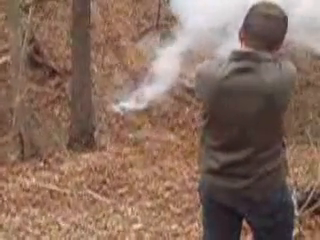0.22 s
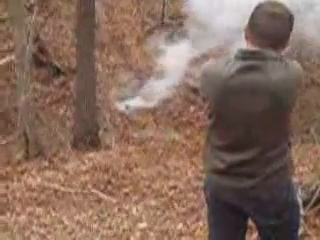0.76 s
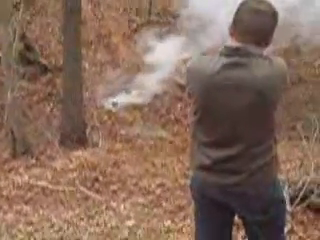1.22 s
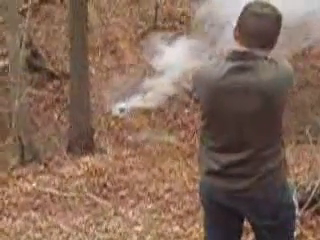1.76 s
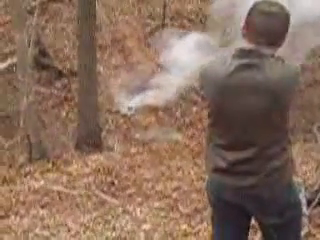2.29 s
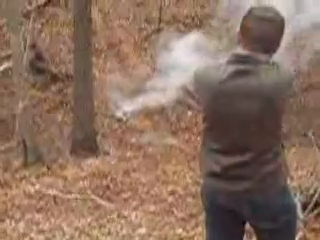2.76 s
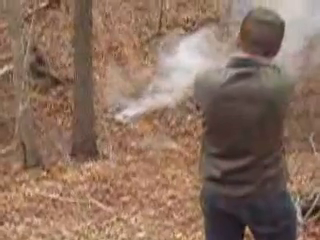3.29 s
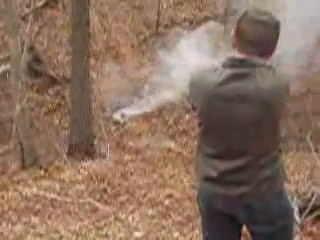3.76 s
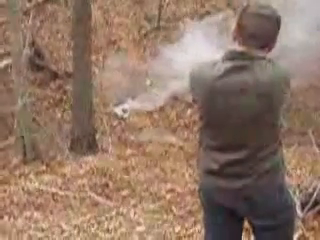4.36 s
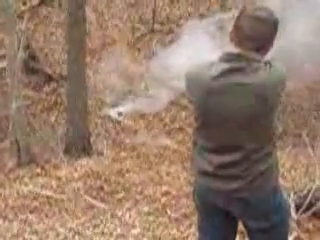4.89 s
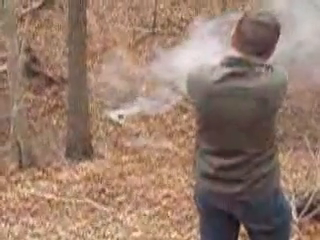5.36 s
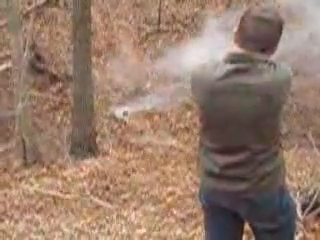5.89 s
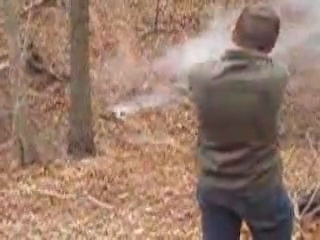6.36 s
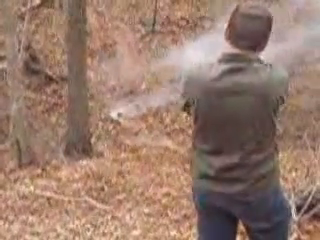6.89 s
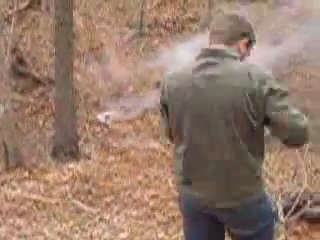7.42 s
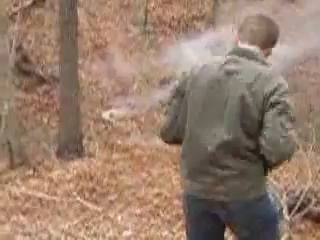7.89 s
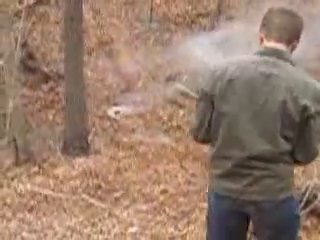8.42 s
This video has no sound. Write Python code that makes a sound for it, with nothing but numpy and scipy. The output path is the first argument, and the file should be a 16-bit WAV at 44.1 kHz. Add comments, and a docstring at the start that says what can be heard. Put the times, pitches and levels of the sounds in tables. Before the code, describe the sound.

In a leafy wood, several guns fire sixteen uneven shots, each a hard distorted crack with a quick ground bounce, slaps off trunks and a diffuse forest tail. A punctured extinguisher jets powder throughout, a fluttering mid-range roar with hiss. The microphone overloads and ducks at every shot, then the jet swells back. After the last shot the jet turns duller and gun steel rattles.

```python
"""In a wood, four guns fire at uneven intervals at a punctured extinguisher that jets powder.
Each blast is a damped swing that bounces off the ground; shaped noise makes its crack and its
scatter in leaves, trunks and forest. The jet is coloured noise with a fluttering flow, duller when spent.
Steel clacks once early and rattles at the end. The camera's input clips on loud peaks,
and its gain control ducks under the shots, then lets the hiss swell back."""
import sys
import numpy as np
from scipy import signal
from scipy.fft import rfft, irfft, next_fast_len
from scipy.io import wavfile
from scipy.ndimage import map_coordinates

SR = 44100
rng = np.random.default_rng(int(sys.argv[2]) if len(sys.argv) > 2 else 0)


def inscribe(sig):
    """Save sig as 16-bit PCM at rate SR to the path in sys.argv[1].

    A 1-D sig is mono; a 2-D sig holds one channel per row.
    Samples are clipped to [-1, 1] before scaling.
    """
    pcm = np.round(np.clip(np.atleast_2d(sig).T, -1, 1) * 32767)
    wavfile.write(sys.argv[1], SR, pcm.astype(np.int16))


N = 381465  # length in samples

# Shots. Each row: start in [s], gun name, strength in [dB].
SHOTS = [(.0283, "round", -1), (1.2385, "round", 1.5), (1.7948, "heavy", 0), (1.885, "light", -3),
         (2.6977, "round", 0), (2.8633, "light", -1.5), (3.3695, "round", -.5), (4.1745, "light", 4),
         (4.4132, "round", -2), (5.1925, "light", 2.5), (5.3104, "round", -1.5), (6.0203, "heavy", -1.5),
         (6.086, "light", -2.5), (6.722, "light", 1.5), (7.0028, "sharp", 0), (7.2706, "light", -2.5)]
# Guns by name. Each row: blast pitch in [Hz], blast t60 in [s], blast level in [dB], thump level in [dB],
# ground bounce delay in [s], bounce in [dB re blast], then crack, leaves, near trunks and forest in [dB].
GUNS = {"round": (530, .014, 26.3, 7, .0039, -12, 0, 8, 2.5, -4.8),
        "heavy": (330, .025, 21.5, 3, .0042, -4, 4.5, 15, 6.5, -3),
        "light": (310, .0065, 20.5, -4, .0037, -1, -2, 7.5, -2, -6),
        "sharp": (320, .028, 14, -6, .0048, -1, 14, 14, 3.5, -6.5)}
# Trunks close by, which answer every gun. Each row: delay in [s], level in [dB re the gun's near trunks].
NEAR_TRUNKS = [(.0305, -1), (.036, 0), (.04, -2), (.067, -3)]
# Slaps from trunks that face one gun only. Each row: gun name, delay in [s], level in [dB].
TRUNK_SLAPS = [("round", .0215, 3), ("round", .0715, 7), ("round", .11, -1), ("light", .0685, 4),
               ("light", .083, 2), ("heavy", .134, -2), ("heavy", .149, -1)]
# Spectrum of the bright crack. Each row: frequency in [Hz], relative level in [dB].
CRACK_SPECTRUM = [(710, -42), (1200, -12), (1510, -4), (2080, -13), (2500, 1), (2820, -9), (5320, -12),
                  (5780, -20), (6220, -20), (10800, -25), (14000, -55), (22000, -120)]
# Spectrum of the blast scattered by the wood. Each row: frequency in [Hz], relative level in [dB].
FOREST_SPECTRUM = [(76, -57), (130, -27), (282, -5), (385, -7), (820, 0), (1350, -9), (1910, -13),
                   (2300, -11), (3090, -14), (3920, -21), (4890, -18), (6940, -21), (7750, -30),
                   (8820, -24), (10600, -31), (13800, -61), (22000, -120)]
# Decay of the forest echoes. Each row: frequency in [Hz], t60 in [s].
FOREST_DECAY = [(200, 1.4), (700, 1.55), (2500, 1.5), (5000, 1.6), (9000, 1.15)]
# Spectrum of the heavy gun's low roll. Each row: frequency in [Hz], relative level in [dB].
ROLL_SPECTRUM = [(20, -25), (120, -24), (170, -13), (240, -1), (340, 1), (480, -8), (800, -22), (3000, -80)]
# Spectrum of the turbulent plume. Each row: frequency in [Hz], relative level in [dB].
ROAR_SPECTRUM = [(71, -67), (120, -37), (172, -29), (210, -15), (247, -9), (488, 0), (557, -2), (643, 0),
                 (954, -2), (1380, -14), (1650, -14), (2140, -44), (3630, -120)]
# Spectrum of the plume's largest eddies. Each row: frequency in [Hz], relative level in [dB].
RUMBLE_SPECTRUM = [(20, -20), (120, -24), (170, -20), (250, -3), (330, 0), (480, -3), (800, -22),
                   (3000, -80)]
# Spectrum of powder rushing through the hole. Each row: frequency in [Hz], relative level in [dB].
HISS_SPECTRUM = [(1030, -30), (1750, 0), (2260, -4), (2420, -3), (3060, -10), (3320, -15), (4290, -18),
                 (5340, -11), (6450, -11), (7000, -6), (7440, -10), (7840, -24), (8270, -13), (8650, -9),
                 (10600, -24), (13800, -54), (22000, -120)]
# Metal clacks and ticks. Each row: start in [s], level in [dB].
CLACKS = [(.745, -27), (8.359, -28), (8.5605, -20), (8.579, -21), (8.584, -22), (8.590, -14.5)]
# Spectrum of the action's rattle. Each row: frequency in [Hz], relative level in [dB].
ACTION_SPECTRUM = [(1000, -35), (1700, -5), (2110, -4), (2540, -6), (2940, -1), (3950, -10), (5020, -6),
                   (6050, -15), (10200, -21), (10800, -28), (14000, -58), (22000, -120)]
# Ringing modes of the action. Each row: frequency in [Hz], level in [dB re clack], t60 in [s].
STEEL_MODES = [(2864, -12, .08), (5012, -17, .09)]
# Spectrum of the open air. Each row: frequency in [Hz], relative level in [dB].
AIR_SPECTRUM = [(20, 0), (120, -3), (250, -20), (1000, -60)]
# Microphone colour. Each row: frequency in [Hz], gain in [dB].
MICROPHONE_RESPONSE = [(20, 0), (700, 0), (1150, 1.2), (2200, 0), (3200, 1.3), (3900, -1.2), (4900, 1.2),
                       (6200, 0), (7400, 0), (7900, -5), (8400, 0), (20000, 0)]
# Top-end response: a dip near 10.9 kHz, a partial return, then a fall.
# Each row: frequency in [Hz], gain in [dB].
TOP_END_RESPONSE = [(20, 0), (10550, 0), (10900, -16), (11700, -9), (12400, -26)]

TRUNK_T60, SLAP_T60, LEAVES_T60, CRACK_T60, THUMP_T60 = .025, .014, .08, .045, .008  # s
SLOPE_DELAY_S, SLOPE_DB = .0085, -16  # a second bounce, off the slope (dB re blast)
SCATTER_DB, SCATTER_T60 = -14.5, .025  # what rough ground scatters (dB re blast, s)
ROLL_DB, ROLL_BUILD_S, ROLL_T60 = -18, .1, 4.5
ROAR_DB, HISS_DB, RUMBLE_DB = -19.9, -29.2, -34.5  # the jet with a full bottle
LEAK_DB_PER_S = .15  # the jet weakens as the pressure falls
SPENT_S, SPENT_RISE_S = 7.7, .8  # the powder starts to run out, and how long that takes
SPENT_RUMBLE_DB, SPENT_HISS_DB, SPENT_ROAR_DB = 10, -2.5, -.7  # level changes once spent: a duller jet
AIR_DB = -53
TOP_HZ = 12435  # nothing is kept above this


def amp(db):
    """Decibels to gain."""
    return np.exp(np.asarray(db) * (np.log(10) / 20))


def unit(x):
    """Scaled to rms 1."""
    return x / np.sqrt(np.mean(x ** 2) + 1e-20)


def along(points, hz):
    """(Hz, value) points read on a log frequency axis."""
    f, v = np.transpose(points)
    return np.interp(np.log(hz + 1), np.log(f + 1), v)


def fade(t, t60):
    """A decay that starts at t = 0 and is 60 dB down at t60."""
    return (t >= 0) * np.exp(-np.log(1000) * np.abs(t) / t60)


def wobble(rate):
    """A smooth random curve, rate knots a second."""
    t = np.arange(N) / SR
    coarse_t = t[::64]
    knots = rng.standard_normal(int(t[-1] * rate) + 4)
    return np.interp(t, coarse_t, map_coordinates(knots, [coarse_t * rate]))


def causal(points, size=4096):
    """Minimum-phase impulse response of a (Hz, dB) spectrum, by folding its cepstrum."""
    gain = amp(along(points, np.fft.rfftfreq(size, 1 / SR)))
    cepstrum = irfft(np.log(np.maximum(gain, 1e-6)))
    cepstrum[1:size // 2] *= 2
    cepstrum[size // 2 + 1:] = 0
    return irfft(np.exp(rfft(cepstrum)))


def coloured(x, points):
    """White noise x given a spectrum, at unchanged power."""
    kernel = causal(points)
    return signal.oaconvolve(x, kernel / np.linalg.norm(kernel))[:len(x)]


def high_pass(x, hz, order):
    """Drop what lies below hz."""
    return signal.sosfilt(signal.butter(order, hz, "high", fs=SR, output="sos"), x)


def add(track, s, sound):
    """Mix a sound into the track at time s."""
    part = track[max(round(s * SR), 0):][:len(sound)]
    part += sound[:len(part)]


def gunfire():
    """Each shot: a muzzle blast with its bounces, a bright crack, then leaves, trunks and the whole forest."""
    blasts, cracks, echoes = np.zeros((3, N))
    t = np.arange(SR // 4) / SR
    for s, gun, db in SHOTS:
        hz, t60, blast_db, thump_db, delay, bounce_db, crack_db, leaves_db, near_db, _ = GUNS[gun]
        blast = push(t, hz, t60)
        blast += amp(bounce_db) * push(t - delay, hz, t60)
        blast += amp(SLOPE_DB) * push(t - SLOPE_DELAY_S, hz, t60)
        thump = amp(thump_db) * fade(t, THUMP_T60)
        add(blasts, s, amp(db) * (amp(blast_db) * blast + thump))
        add(cracks, s, amp(db + crack_db) * fade(t, CRACK_T60) * rng.standard_normal(len(t)))
        # scattered echoes overlap at random, so their powers add
        power = (amp(leaves_db) * fade(t, LEAVES_T60)) ** 2
        power += trunk_power(t, gun, near_db)
        power += (amp(blast_db + SCATTER_DB) * fade(t - delay, SCATTER_T60)) ** 2
        add(echoes, s, amp(db) * np.sqrt(power) * rng.standard_normal(len(t)))
    scattered = echoes + forest_tail(lumpy_db=1.4, build_up_s=.06)
    wood = high_pass(coloured(scattered, FOREST_SPECTRUM), hz=185, order=4)
    # a blast wave carries no net push: little is left below its swing
    return high_pass(blasts, hz=45, order=2) + coloured(cracks, CRACK_SPECTRUM) + wood


def push(t, hz, t60):
    """Air pressure of a muzzle blast: a shock front, then a damped swing."""
    return np.cos(2 * np.pi * hz * t) * fade(t, t60)


def trunk_power(t, gun, near_db):
    """Echo power at time t after a shot: the near trunks, and the slaps that this gun gets."""
    near = sum((amp(near_db + db) * fade(t - lag, TRUNK_T60)) ** 2 for lag, db in NEAR_TRUNKS)
    slaps = sum((amp(db) * fade(t - lag, SLAP_T60)) ** 2 for name, lag, db in TRUNK_SLAPS if name == gun)
    return near + slaps


def forest_tail(lumpy_db, build_up_s):
    """Countless overlapping echoes of all shots, as lumpy noise; the highest treble dies first."""
    hz, when, z = signal.stft(rng.standard_normal(N), SR, nperseg=256)
    t60 = along(FOREST_DECAY, hz)[:, None]
    power = np.zeros(z.shape)
    for s, gun, db in SHOTS:
        forest_db = GUNS[gun][-1]
        heard = (when > s) & (when < s + 2)
        age = when[heard] - s
        density = 1 - np.exp(-age / build_up_s)  # more trees answer as the wave spreads
        power[:, heard] += density * (amp(db + forest_db) * fade(age, t60)) ** 2
    tail = signal.istft(z * np.sqrt(power), SR, nperseg=256)[1][:N]
    return tail * unit(amp(lumpy_db * wobble(150)))


def roll():
    """The bass of each heavy shot comes back from far off: low noise that builds up and lingers."""
    power = np.zeros(N)
    for s, gun, db in SHOTS:
        if gun == "heavy":
            age = np.maximum(np.arange(N) / SR - s, 0)
            build_up = 1 - np.exp(-age / ROLL_BUILD_S)
            power += build_up * (amp(db + ROLL_DB) * fade(age, ROLL_T60)) ** 2
    return np.sqrt(power) * coloured(rng.standard_normal(N), ROLL_SPECTRUM)


def jet():
    """The plume roars and rumbles, the hole hisses; pressure loss and uneven powder flow move them all."""
    t = np.arange(N) / SR
    flow_db = -LEAK_DB_PER_S * t + .4 * wobble(7) + .3 * wobble(40)
    eddies_db = .55 * wobble(25)
    spent = np.clip((t - SPENT_S) / SPENT_RISE_S, 0, 1)
    roar = high_pass(coloured(rng.standard_normal(N), ROAR_SPECTRUM), hz=240, order=2)
    roar *= amp(ROAR_DB + SPENT_ROAR_DB * spent + eddies_db)
    rumble = coloured(rng.standard_normal(N), RUMBLE_SPECTRUM)
    rumble *= amp(RUMBLE_DB + SPENT_RUMBLE_DB * spent + eddies_db)
    hiss = coloured(rng.standard_normal(N), HISS_SPECTRUM)
    hiss *= amp(HISS_DB + SPENT_HISS_DB * spent)
    return amp(flow_db) * (roar + rumble + hiss)


def action():
    """Steel parts of a gun meet: a short rattle of noise and a faint ring of damped sines."""
    rattle, ring = np.zeros((2, N))
    t = np.arange(SR // 4) / SR
    for s, db in CLACKS:
        add(rattle, s, amp(db) * fade(t, .07) * rng.standard_normal(len(t)))
        for hz, level_db, t60 in STEEL_MODES:
            add(ring, s, amp(db + level_db) * fade(t, t60) * np.sin(2 * np.pi * hz * t))
    return coloured(rattle, ACTION_SPECTRUM) + ring


def air():
    """Open air stirs under everything: faint low noise."""
    return amp(AIR_DB) * coloured(rng.standard_normal(N), AIR_SPECTRUM)


def scene():
    """Everything as it reaches the microphone."""
    return (jet() + gunfire() + roll() + action() + air())[None]


def gain_control(x, knee_db, depth_db, release_db_per_s, attack_s, start_db):
    """Peaks over the knee pull the gain down fast; it climbs back at a steady rate."""
    over = np.clip(20 * np.log10(np.abs(x) + 1e-9) - knee_db, 0, depth_db)
    climb = release_db_per_s * np.arange(N) / SR
    held = np.maximum(np.maximum.accumulate(over + climb), start_db) - climb
    pole = np.exp(-1 / (attack_s * SR))
    cut_db = start_db + signal.lfilter([1 - pole], [1, -pole], held - start_db)
    return x * amp(-cut_db)


def record(dry):
    """Microphone colour, gain control, an off-centre input stage that clips, and the band limit."""
    x = signal.oaconvolve(dry[0], causal(MICROPHONE_RESPONSE))[:N]
    x = gain_control(x, knee_db=-7.5, depth_db=19, release_db_per_s=16, attack_s=.003, start_db=6)
    bias = -.045  # constant offset, so the two halves of the wave clip unevenly
    x = np.clip(x + bias, -.69, .69) - bias
    size = next_fast_len(N + SR // 4)
    hz = np.fft.rfftfreq(size, 1 / SR)
    band = amp(along(TOP_END_RESPONSE, hz)) * (hz < TOP_HZ)
    return irfft(rfft(x, size) * band, size)[None, :N] + bias


dry = scene()
out = record(dry)
inscribe(out)
```